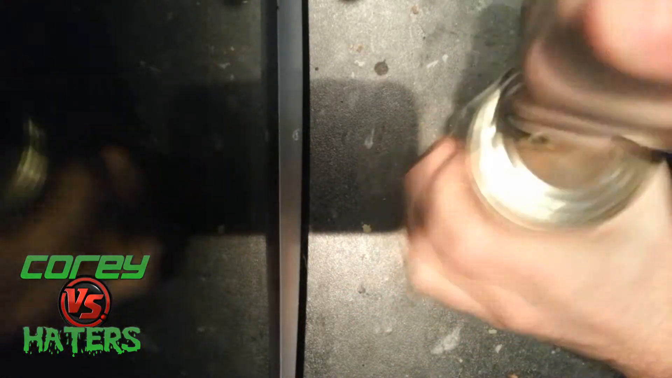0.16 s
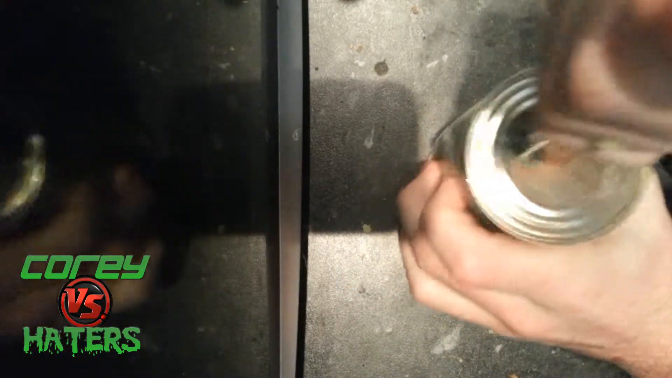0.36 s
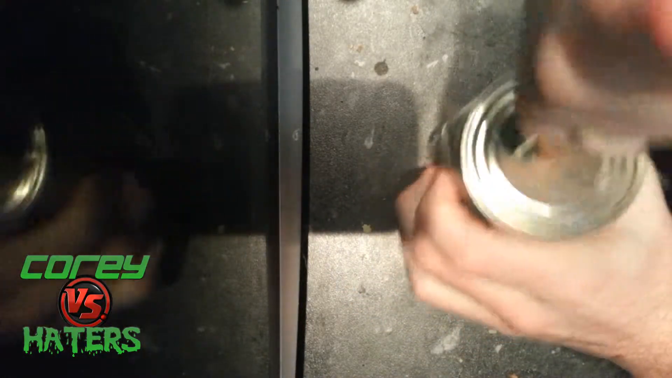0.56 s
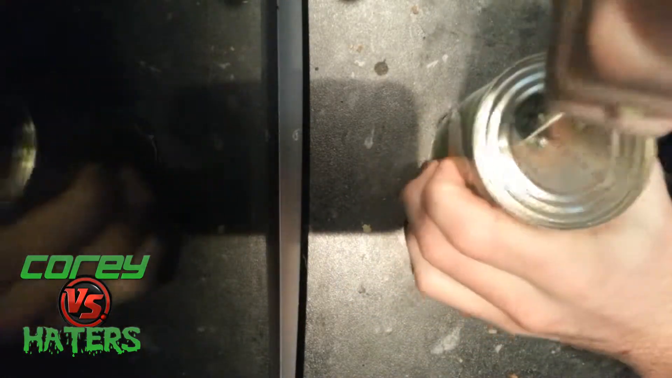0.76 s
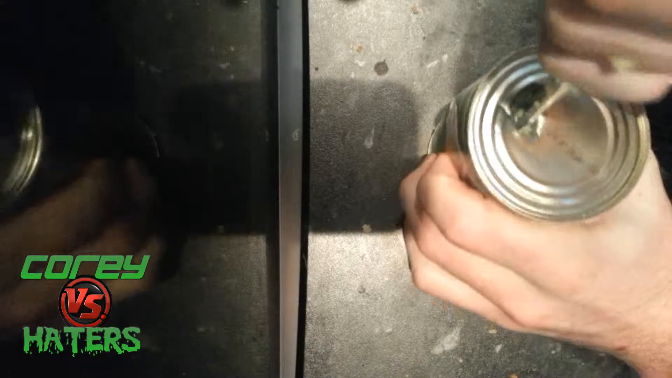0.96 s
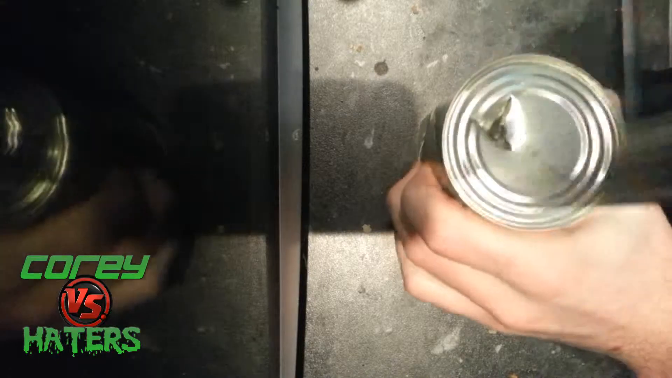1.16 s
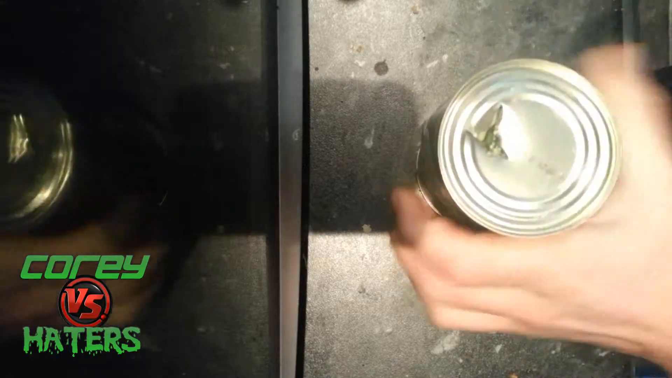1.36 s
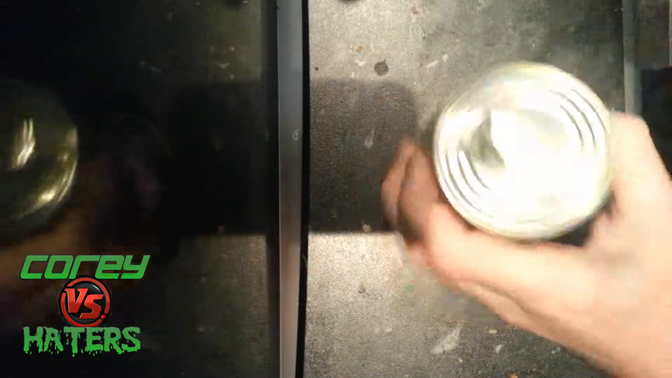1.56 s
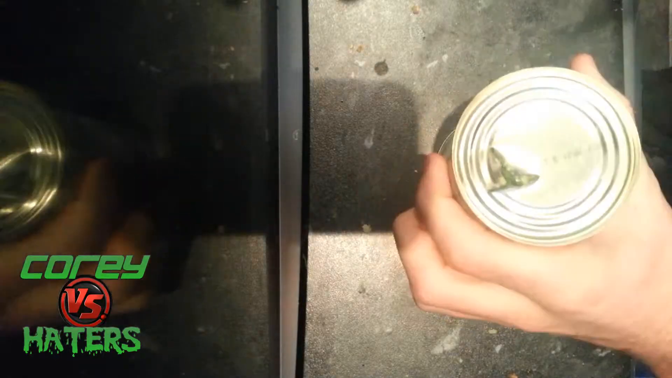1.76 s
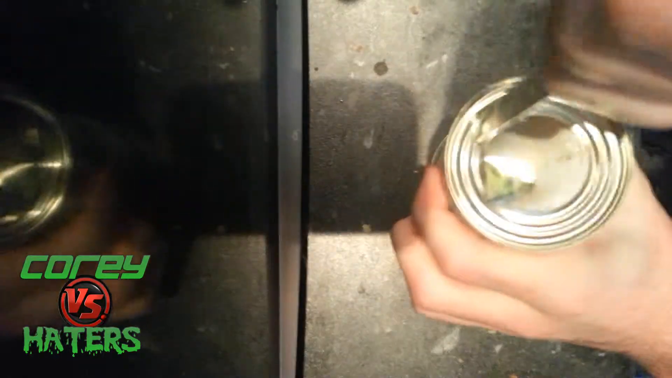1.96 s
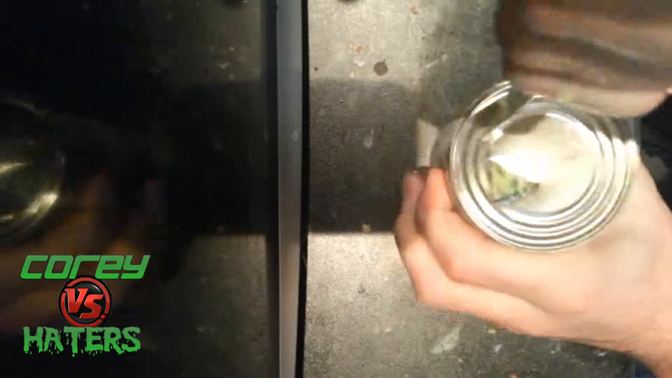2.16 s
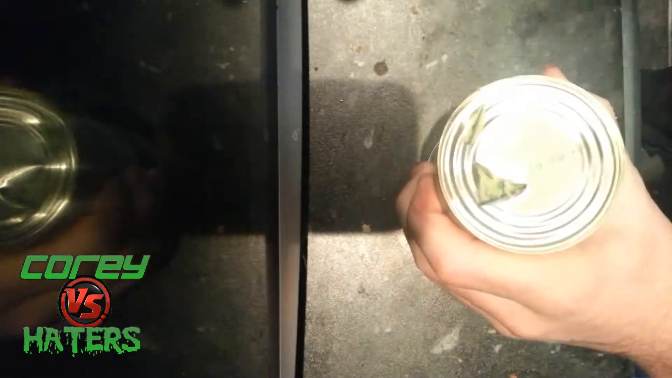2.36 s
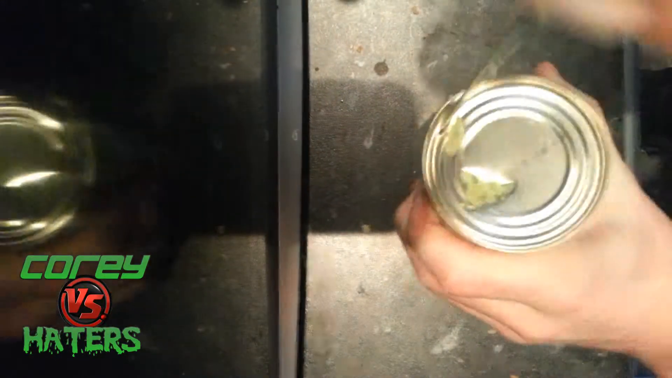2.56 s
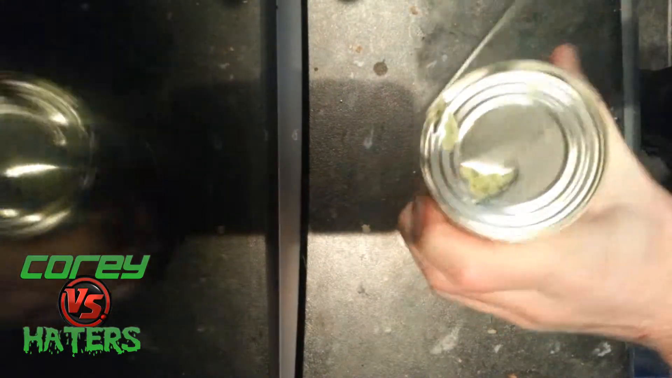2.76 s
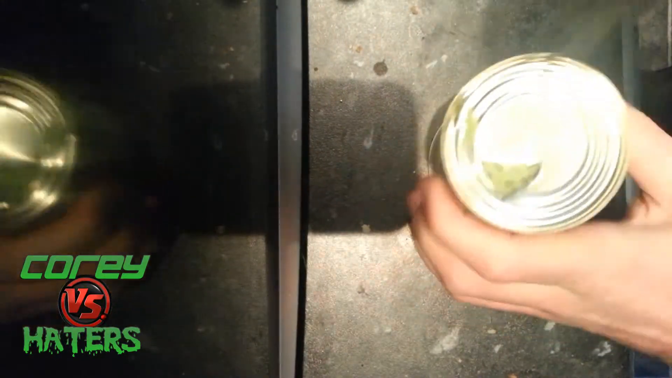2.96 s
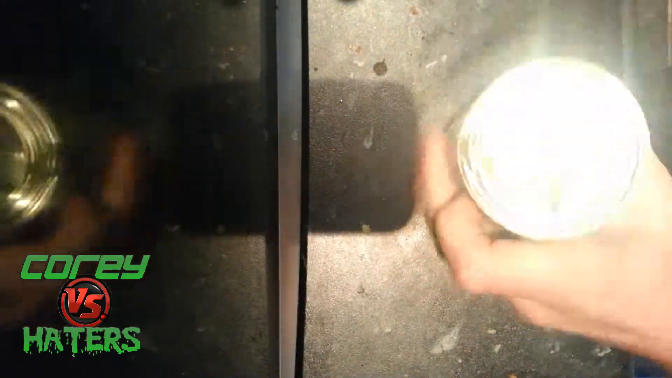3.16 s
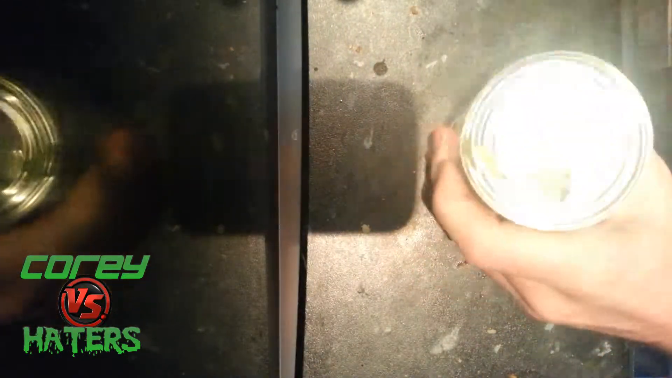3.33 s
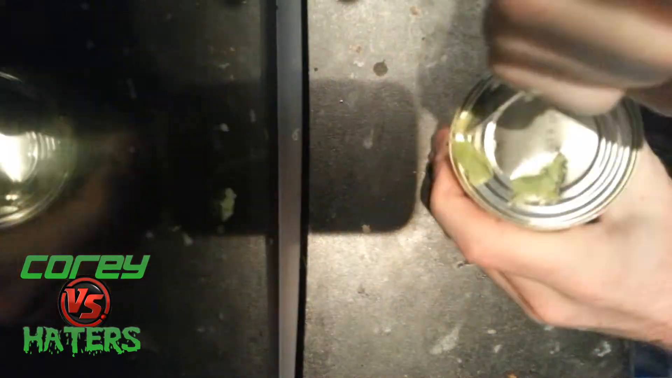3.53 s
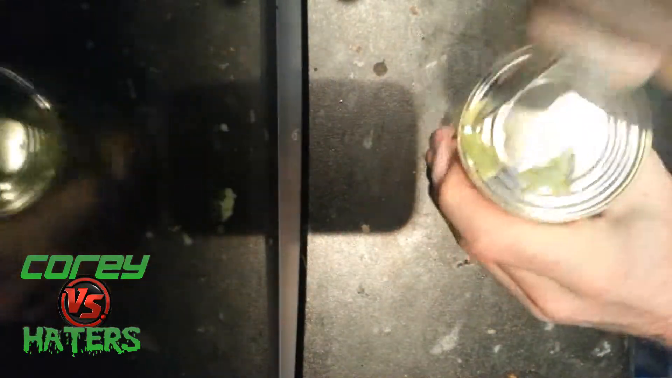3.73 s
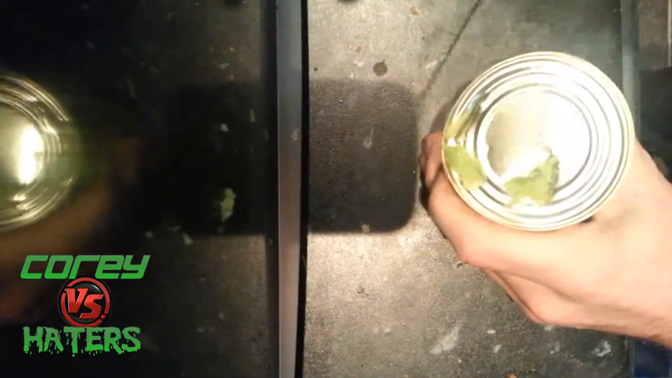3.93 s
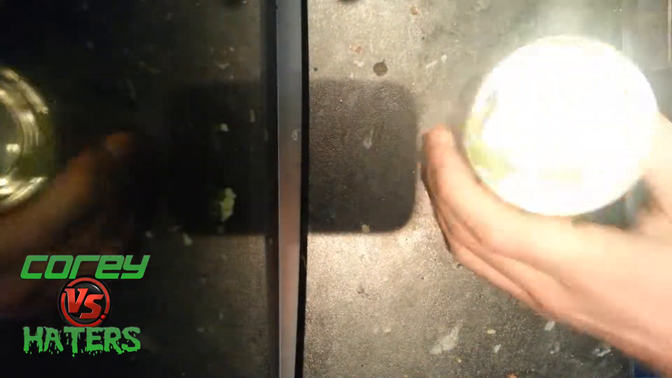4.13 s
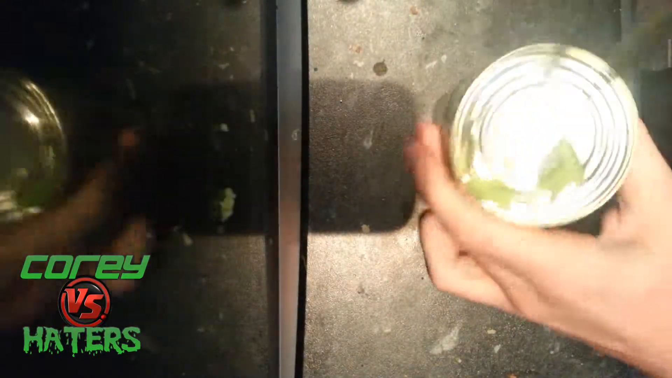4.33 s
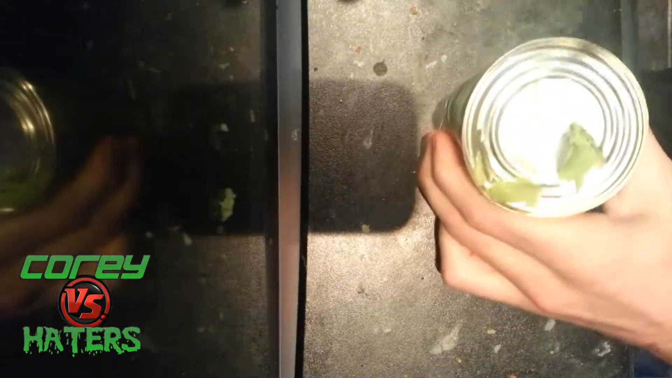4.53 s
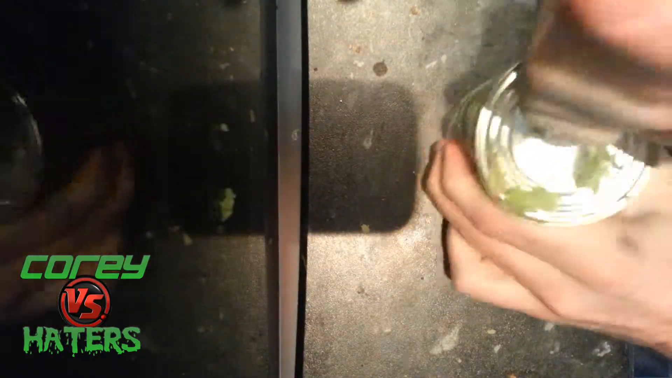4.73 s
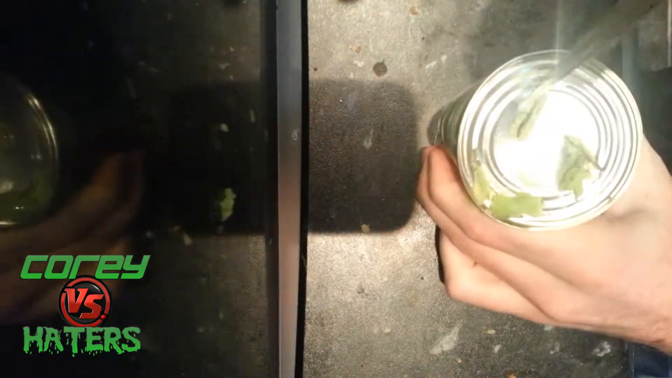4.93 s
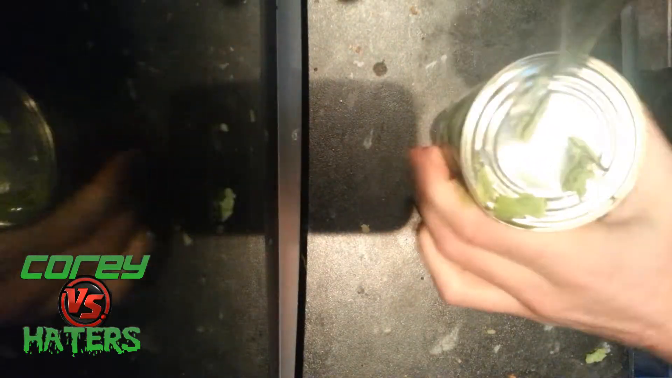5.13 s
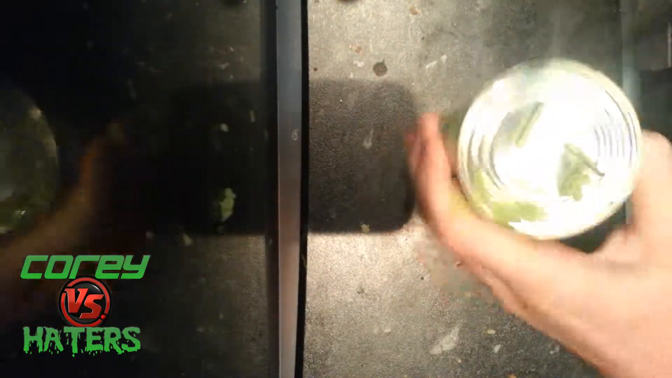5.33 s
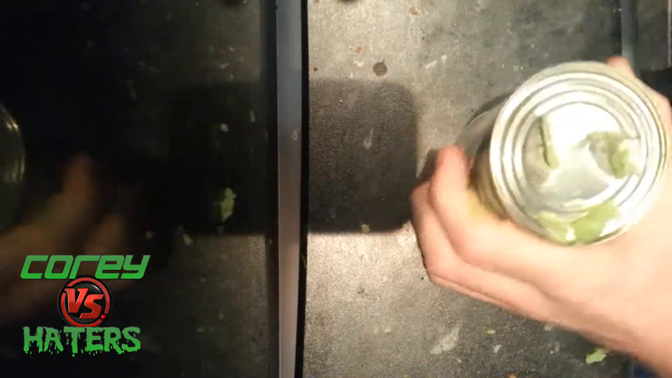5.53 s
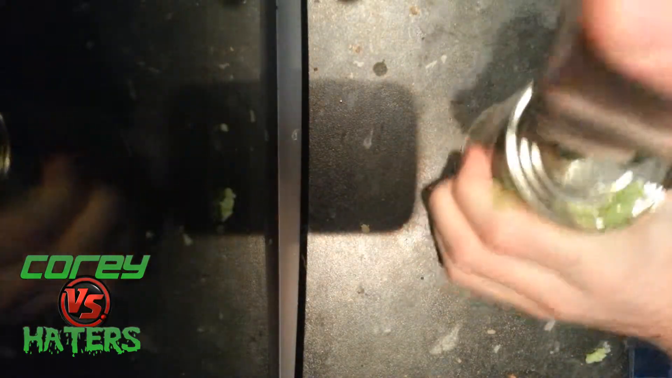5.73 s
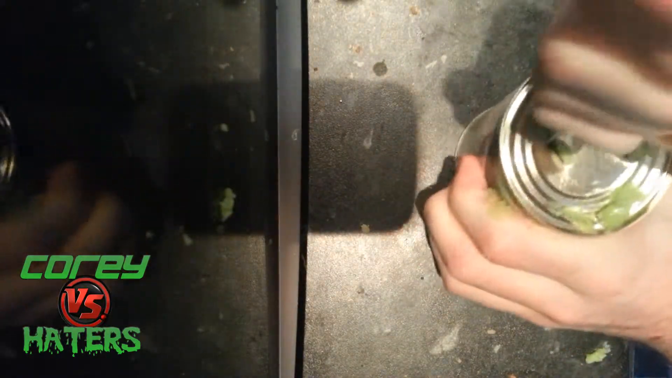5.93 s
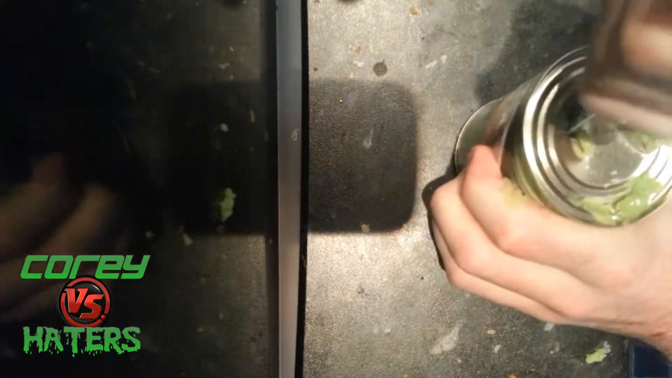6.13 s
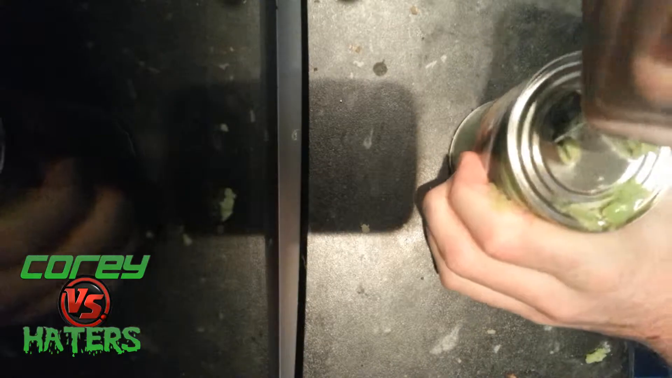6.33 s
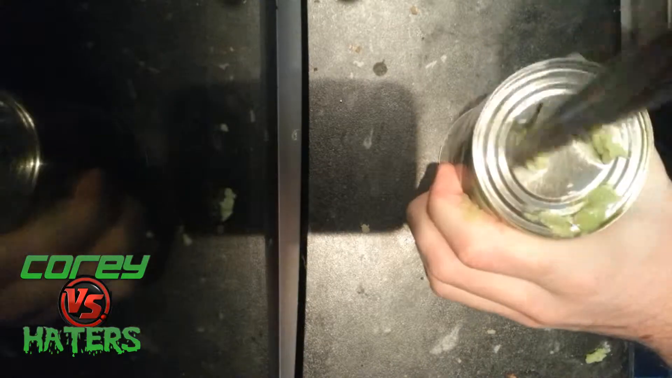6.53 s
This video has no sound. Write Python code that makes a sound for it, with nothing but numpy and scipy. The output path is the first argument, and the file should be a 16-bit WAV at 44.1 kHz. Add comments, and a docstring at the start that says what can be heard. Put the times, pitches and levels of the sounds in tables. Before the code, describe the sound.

A knife point punches into the lid of a tin can nine times, mostly about a second apart. Each stab is a sharp crack with a hollow knock and a brief metallic clang. Between blows the blade scrapes and catches, the lid pops, and the can rocks and slides on the counter. The kitchen adds a short echo over a soft hush, and the loudest hits overload the close microphones.

```python
"""A knife stabs nine times into the lid of a tin can on a kitchen counter and is worked free between blows.
Each stab knocks the can, clangs the torn lid and cracks at the knife's point. In between, the blade
scrapes and catches, the lid pops, and the can rocks and slides. Twice the counter shudders.
The kitchen echoes over a soft hush of air, and loud stabs overload the two close microphones."""
import sys
import numpy as np
from scipy import signal
from scipy.fft import rfft, irfft, next_fast_len
from scipy.io import wavfile
from scipy.ndimage import uniform_filter1d

SR = 44100
rng = np.random.default_rng(int(sys.argv[2]) if len(sys.argv) > 2 else 0)


def dump(signal):
    """Clip the signal to [-1, 1] and save it as 16-bit WAV at the path in sys.argv[1]."""
    limited = np.clip(np.atleast_2d(signal).T, -1, 1)
    pcm = np.round(limited * 32767).astype(np.int16)
    wavfile.write(sys.argv[1], SR, pcm)


N = 290715

# the can rocks back onto the counter: (time [s], level [dB], ring pitch [Hz])
KNOCKS = [(0.003, -27, 770), (0.045, -31, 746), (0.509, -25.5, 780), (0.576, -32, 764), (0.789, -16, 832),
          (0.910, -22, 760), (2.218, -19.5, 850), (3.006, -22, 790), (4.144, -14.5, 657),
          (4.868, -22.5, 760), (5.083, -23.5, 652), (5.300, -32.5, 710), (6.113, -32, 715),
          (6.275, -14.5, 753), (6.326, -9, 800)]
# steel drags on tin: (loudest time [s], length [s], level [dB], rasp [dB], squeal [dB], flap pitch [Hz])
SCRAPES = [ (0.101, 0.29, -49.5, -12.5, 5, 3240), (0.211, 0.041, -20.5, 13, 9.5, 3150),
           (0.38, 0.043, -25.5, 7.5, -1, 3600), (2.043, 0.092, -28, -4, -19, 3600),
           (2.248, 0.019, -18.5, 9.5, -8, 4530), (2.657, 0.037, -14, -1, -2.5, 4150),
           (2.738, .11, -17.5, 3, -4.5, 4200), (3.532, 0.048, -22, -5, -0.5, 3600),
           (3.828, .026, -28.5, 12, -19, 4200), (3.857, .009, -20, 3.5, -9.5, 4350),
           (4.804, 0.029, -23, 4, -20, 2920), (5.938, 0.032, -12.5, -4, -9, 2320),
           (6.267, 0.015, -23, -3.5, -17, 5250), (6.473, 0.027, -5.5, 4.5, -8.5, 2250),
           (6.529, 0.11, -29, -10.5, -4, 5100), ]
# full blows; harder ones crack more and knock less:
# (time [s], level [dB], hardness [dB], can pitch [Hz], flap pitch [Hz], flap boost [dB], crunch fade [s])
STABS = [ (0.184, -15.5, 5, 786, 4150, 6, 0.086), (1.077, -14.5, 3, 812, 2640, -1.5, 0.13),
         (1.922, -11, 2.5, 739, 3370, -11, 0.077), (2.26, -25.5, -6.5, 788, 1240, 12.5, 0.058),
         (2.543, -11.5, -2, 764, 2280, 0.5, 0.071), (3.419, -11.5, 0.5, 798, 4400, -15.5, 0.11),
         (4.59, -15, 0, 731, 4320, 4, 0.13), (5.656, -16, 4, 684, 3920, 4, 0.099),
         (6.434, -13, 2.5, 734, 2450, -4, .17), ]
# the blade catches on the cut edge: (time [s], level [dB], hardness [dB])
TAPS = [(0.387, -25.5, 4), (1.122, -14, 7), (1.547, -34.5, 9.5), (3.071, -11.5, -1), (3.807, -31.5, -6),
        (3.843, -29, -7.5), (4.087, -48.5, 3.5), (4.910, -31, 14), (5.084, -37.5, 8), (5.199, -50, -2),
        (5.236, -53, 5)]
# the can slides: (loudest time [s], rise [s], fall [s], level [dB])
SLIDES = [(1.671, 0.11, 0.044, -32.5), (4.23, 0.06, 0.041, -34), (4.42, 0.03, 0.039, -47.5),
          (5.33, 0.037, 0.078, -38), (5.46, 0.051, 0.046, -36.5)]
# the lid buckles: (time [s], level [dB], pitch [Hz])
POPS = [(2.306, -26.5, 1157), (4.676, -23.5, 770), (5.909, -18.5, 4320), (5.988, -21.5, 2060),
        (6.137, -33.5, 1340), (6.142, -25.5, 1170), (6.25, -22, 1330), (6.348, -24, 1880),
        (6.356, -18, 1790)]
# the counter shudders: (loudest time [s], rise [s], fall [s], level [dB])
SHUDDERS = [(2.72, 0.06, 0.19, -32), (3.521, 0.04, 0.11, -32)]

# the notes each part rings at; narrow ones ring longer: (pitch [Hz], width [Hz], level [dB])
RIM_NOTES = [(328.4, 61, -11), (555, 128, -6.5), (685, 123, -0.5), (832, 127, -2), (916, 42, -3.5),
             (1143, 100, -2.5), (1500, 930, -17), (1930, 410, -15.5)]  # the can's bottom rim on the counter
CAN_NOTES = [(323, 100, -16), (537, 81, -7), (673, 57, -3), (778.5, 78.4, -1.5), (944, 248, -5.5),
             (1141, 105, -2.5), (1645, 930, -16)]
LID_NOTES = [(1370, 166, 1), (1773, 297, 1), (2558, 736, -0.5), (3335, 940, 1), (3828, 830, 3),
             (4413, 810, -1), (4974, 150, -11.5)]
COUNTER_NOTES = [(241, 80, -2.5), (353.6, 12, -2), (427.6, 48, -2.5)]
THUMP_NOTES = [(72, 16, 0)]  # the counter gives under a blunt blow

# tone of the room's air, the knife's point and the sliding rim: (frequency [Hz], level [dB])
AIR_TONE = [(18, -22), (30, 0.5), (97, -5.5), (253, -1), (437, 0.5), (612, -3.5), (1410, -15.5),
            (3780, -12.5), (6040, -24.5), (6530, -16.5), (7830, -22), (8690, -18), (12800, -17.5),
            (15000, -42)]
POINT_TONE = [(1500, -9.5), (4000, 7.5), (6000, -1.5), (9000, -4), (13000, -10), (15000, -24)]
GRIT_TONE = [(120, -52), (350, -7), (750, 4), (1300, -1.5), (2200, -9), (4000, -21), (8000, -30.5),
             (14000, -35.5)]

# how long the kitchen's echo takes to drop 60 dB: (frequency [Hz], fade time [s])
ECHO_FADE = [(100, 0.043), (250, 0.57), (700, 0.6), (2000, 0.63), (4200, 0.55), (7000, 0.56), (14000, 0.21)]
# stereo balance of the echo and of the direct sound: (frequency [Hz], left minus right [dB])
ECHO_BALANCE = [(150, 0.5), (400, 10), (1300, 2), (4400, 5), (8000, -2), (14000, -8)]
DIRECT_BALANCE = [(300, 0.0), (800, -6), (2000, -8.5), (8000, -13), (14000, -7.5)]

CAN_HZ = 739  # pitch of the can held at rest
HEAVY_DB, COUNTER_GROWS = -9.5, 0.84  # a heavy blow; counter dB gained per dB of blow


def amp(db):
    """Turn decibels into a gain."""
    return 10 ** (np.asarray(db) / 20)


def unit(x):
    """Scale x to an average (rms) level of 1."""
    return x / np.sqrt(np.mean(x ** 2) + 1e-20)


def along(points, hz):
    """Read between the rows of a (frequency, value) table, on a log scale."""
    f, v = np.transpose(points)
    return np.interp(np.log(hz + 1), np.log(f + 1), v)


def filtered(x, response):
    """Multiply each frequency in x by response(frequency)."""
    n = x.shape[-1]
    padded = next_fast_len(n + 4096)
    return irfft(rfft(x, padded) * response(np.fft.rfftfreq(padded, 1 / SR)), padded)[..., :n]


def ring(x, notes, stretch=1):
    """Let the force x ring an object's notes, pitches times stretch; the energy stays the same."""
    low, high = notes[0][0] / 2, notes[-1][0] * 2

    def response(f):
        peaks = sum((-1) ** k * amp(db) * 1j * f * width / (hz * hz - f * f + 1j * f * width)
                    for k, (hz, width, db) in enumerate(notes))
        roll_off = (1j * f / (low + 1j * f)) ** 2 * (high / (high + 1j * f)) ** 2
        return peaks * roll_off

    return unit(filtered(x, lambda f: response(f / stretch))) * np.std(x)


def colour(x, tone):
    """Shape x with a tone table; the energy stays the same."""
    return unit(filtered(x, lambda f: amp(along(tone, f)))) * np.std(x)


def add(track, s, sound):
    """Mix a sound into the track at s seconds."""
    start = round(s * SR)
    sound = sound[max(-start, 0):max(N - start, 0)]
    track[max(start, 0):][:len(sound)] += sound


def impact(fade_s, snap):
    """The force of one hit: a snap, then tin buckling as it dies away."""
    t = np.arange(SR // 3) / SR
    force = rng.standard_normal(len(t)) * amp(-60 * t / fade_s)
    force /= np.linalg.norm(force)
    force[0] += snap
    # a hard hit feeds all frequencies evenly, and ends when the blade stops
    force = irfft(np.exp(1j * np.angle(rfft(force, SR))))[:len(t)]
    force *= np.exp(-(2 * t / fade_s) ** 2)
    return force / np.linalg.norm(force) * np.sqrt(SR / 100)  # the energy of 10 ms at level 1


def friction(rise, fall, rough_db):
    """The force of rubbing that sticks and slips; it swells for two rise times, then fades."""
    t = np.arange(round((2 * rise + 3 * fall) * SR) + SR // 20) / SR - 2 * rise
    slips = unit(uniform_filter1d(rng.standard_normal(SR), SR // 500))[:len(t)]
    grain = unit(rng.standard_normal(SR)[:len(t)] * amp(rough_db * slips))
    return grain * np.exp(-(t / np.where(t < 0, rise, fall)) ** 2)


def room_air(level_db=-53):
    """The air in the room makes a steady hush."""
    return amp(level_db) * colour(rng.standard_normal((2, N)), AIR_TONE)


def can_knocks(knock_db=-3.5, ring_db=-7, ring_width_hz=35, lid_db=-17, point_db=-38):
    """The bottom rim meets the counter: a hollow knock with a trace of the lid's lowest notes."""
    out = np.zeros(N)
    for s, db, can_hz in KNOCKS:
        can_note = [(can_hz, ring_width_hz, 0)]
        add(out, s, amp(db + knock_db) * ring(impact(fade_s=0.02, snap=0.63), RIM_NOTES))
        add(out, s, amp(db + ring_db) * ring(impact(fade_s=0.02, snap=0.5), can_note))
        add(out, s, amp(db + lid_db) * ring(impact(fade_s=0.033, snap=0.049), LID_NOTES[:2]))
        add(out, s, amp(db + point_db) * colour(impact(fade_s=0.013, snap=0.05), POINT_TONE))
    return out


def blade_scrapes(can_db=-4, lid_db=-1.5, point_db=-13, flap_db=0.5, flap_width_hz=450):
    """The blade drags through the slit and shakes the tin; its edge rasps and the cut flap squeals."""
    out = np.zeros(N)
    for s, length, db, rasp_db, squeal_db, flap_hz in SCRAPES:
        rise = fall = length / 2
        force = friction(rise, fall, rough_db=4.5)
        tin = amp(can_db) * ring(force, CAN_NOTES) + amp(lid_db) * ring(force, LID_NOTES)
        rasp = amp(point_db + rasp_db) * colour(force, POINT_TONE)
        squeal = amp(flap_db + squeal_db) * ring(force, [(flap_hz, flap_width_hz, 0)])
        add(out, s - 2 * rise, amp(db) * (tin + rasp + squeal))
    return out


def knife_stabs(counter_db=-11, thump_db=2, can_db=10.5, lid_db=9, point_db=1,
                ring_db=5, ring_width_hz=40, flap_db=7, flap_width_hz=420):
    """The point punches through: the counter, can, lid and freshly cut flap all ring."""
    out = np.zeros(N)
    for s, db, hard, can_hz, flap_hz, flap_boost, crunch in STABS:
        push_db = HEAVY_DB + COUNTER_GROWS * (db - HEAVY_DB)
        can_note = [(can_hz, ring_width_hz, 0)]
        flap_note = [(flap_hz, flap_width_hz, 0)]
        add(out, s, amp(push_db + counter_db) * ring(impact(crunch, snap=0.72), COUNTER_NOTES))
        add(out, s, amp(db - 2 * hard + thump_db) * ring(impact(crunch, snap=0.76), THUMP_NOTES))
        add(out, s, amp(db - hard + can_db) * ring(impact(crunch, snap=0.22), CAN_NOTES, can_hz / CAN_HZ))
        add(out, s, amp(db - hard + ring_db) * ring(impact(crunch, snap=0.24), can_note))
        add(out, s, amp(db + lid_db) * ring(impact(crunch, snap=0.22), LID_NOTES))
        add(out, s, amp(db + flap_boost + flap_db) * ring(impact(crunch, snap=0.21), flap_note))
        add(out, s, amp(db + hard + point_db) * colour(impact(1.1 * crunch, snap=0.079), POINT_TONE))
    return out


def blade_taps(knock_db=-1, lid_db=-2, point_db=-9):
    """The blade catches on the cut edge and nudges the can."""
    out = np.zeros(N)
    for s, db, hard in TAPS:
        add(out, s, amp(db - hard + knock_db) * ring(impact(fade_s=0.037, snap=0.93), RIM_NOTES))
        add(out, s, amp(db + lid_db) * ring(impact(fade_s=0.021, snap=0.049), LID_NOTES))
        add(out, s, amp(db + hard / 2 + point_db) * colour(impact(fade_s=0.0086, snap=0.05), POINT_TONE))
    return out


def can_slides(level_db=-2):
    """The hand shifts the can, and its bottom rim grinds softly over the counter."""
    out = np.zeros(N)
    for s, rise, fall, db in SLIDES:
        force = friction(rise, fall, rough_db=2.5)
        add(out, s - 2 * rise, amp(db + level_db) * colour(force, GRIT_TONE))
    return out


def lid_pops(knock_db=-5, lid_db=-3, point_db=-22, note_db=1, width_hz=260):
    """The blade levers the lid until it snaps over with a short, pitched tock."""
    out = np.zeros(N)
    for s, db, hz in POPS:
        force = impact(fade_s=0.009, snap=0.25)
        tin = amp(knock_db) * ring(force, RIM_NOTES) + amp(lid_db) * ring(force, LID_NOTES)
        click = amp(point_db) * colour(force, POINT_TONE)
        tock = amp(note_db) * ring(force, [(hz, width_hz, 0)])
        add(out, s, amp(db) * (tin + click + tock))
    return out


def counter_shudders():
    """Two of the heaviest blows leave the counter shaking."""
    out = np.zeros(N)
    for s, rise, fall, db in SHUDDERS:
        force = friction(rise, fall, rough_db=7)
        add(out, s - 2 * rise, amp(db) * ring(force, COUNTER_NOTES))
    return out


def direct_sound(x, lag_s=0.0003757):
    """The can stands nearer the right microphone, so the left hears it later and duller."""
    def response(f):
        half_db = along(DIRECT_BALANCE, f) / 2
        delay = np.exp(-2j * np.pi * f * lag_s)
        return np.array([amp(half_db) * delay, amp(-half_db)])

    return filtered(x, response)


def kitchen_echo(x, early_db, early_fade_s=0.1, build_s=0.00052):
    """Nearby hard surfaces answer at once, then the room dies away, deep bass and high treble first."""
    hz, t, noise = signal.stft(rng.standard_normal((2, SR)), SR, nperseg=256)
    early = amp(early_db - 60 * t / early_fade_s)
    late = amp(-60 * t / along(ECHO_FADE, hz)[:, None])
    tail = signal.istft(noise * (early + late), SR, nperseg=256)[1]
    tail *= 1 - np.exp(-np.arange(tail.shape[1]) / SR / build_s)
    echo = signal.fftconvolve(x[None], tail / np.linalg.norm(tail[0]), axes=1)[:, :N]
    return filtered(echo, lambda f: amp(np.outer([0.5, -0.5], along(ECHO_BALANCE, f))))


def gain_control(x, depth_db=7, response_s=0.17):
    """Peaks above 1 turn the volume down; it takes a moment to bite and then creeps back."""
    excess = np.clip(np.abs(x).max(axis=0) - 1, 0, 1)
    keep = np.exp(-1 / (response_s * SR))
    smoothed = signal.lfilter([1 - keep], [1, -keep], excess)
    return x * amp(-depth_db * smoothed)


def scene(heavy_echo_db=0.5, light_echo_db=-2):
    """Knife and can, heard directly and as echo; the full blows fill the room most."""
    heavy = knife_stabs() + counter_shudders()
    light = can_knocks() + blade_taps() + lid_pops() + blade_scrapes() + can_slides()
    echo = amp(heavy_echo_db) * kitchen_echo(heavy, early_db=5)
    echo += amp(light_echo_db) * kitchen_echo(light, early_db=3)
    return direct_sound(heavy + light) + echo + room_air()


def record(dry, low_cut_hz=180, high_cut_hz=15000):
    """The microphones cut the bass, overload on loud stabs and lose the highest treble."""
    thin = signal.sosfilt(signal.butter(3, low_cut_hz, "highpass", fs=SR, output="sos"), dry)
    clipped = np.clip(gain_control(thin), -0.98, 0.98)  # smears a stab down to the lowest notes
    return filtered(clipped, lambda f: 1 / np.sqrt(1 + (f / high_cut_hz) ** 80))


dry = scene()
out = record(dry)
dump(out)
```